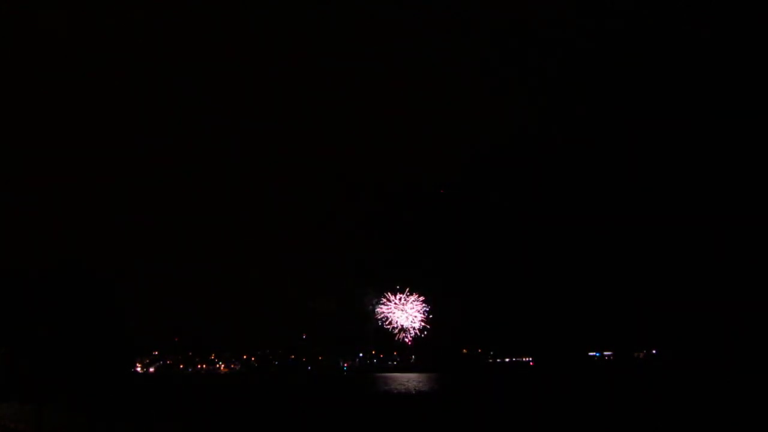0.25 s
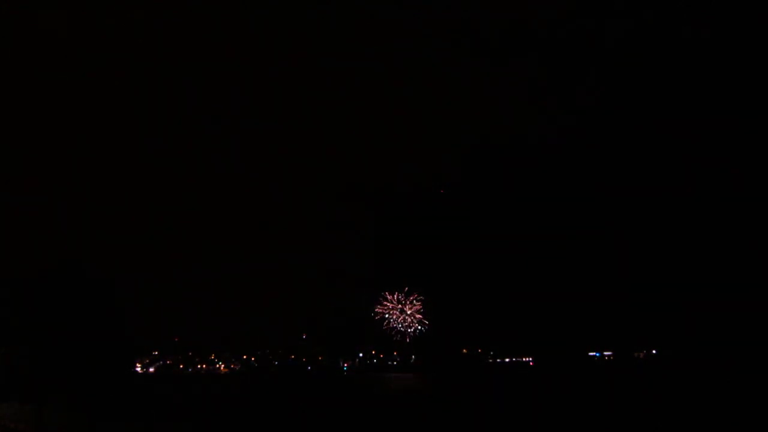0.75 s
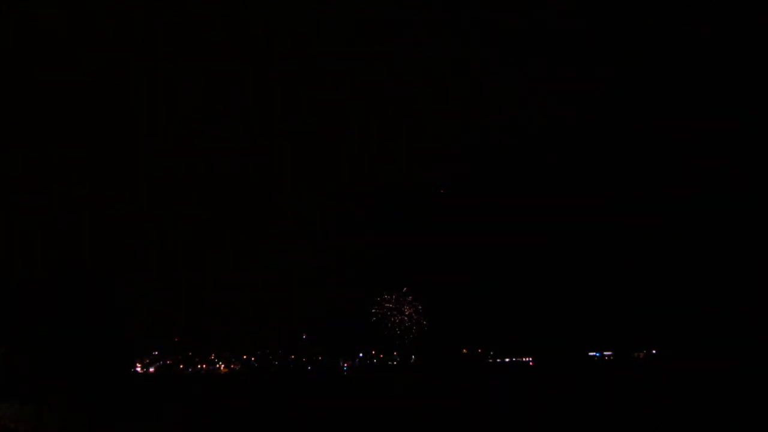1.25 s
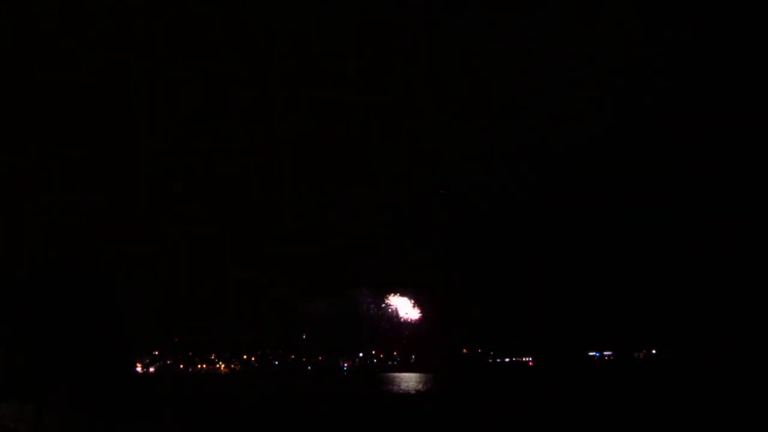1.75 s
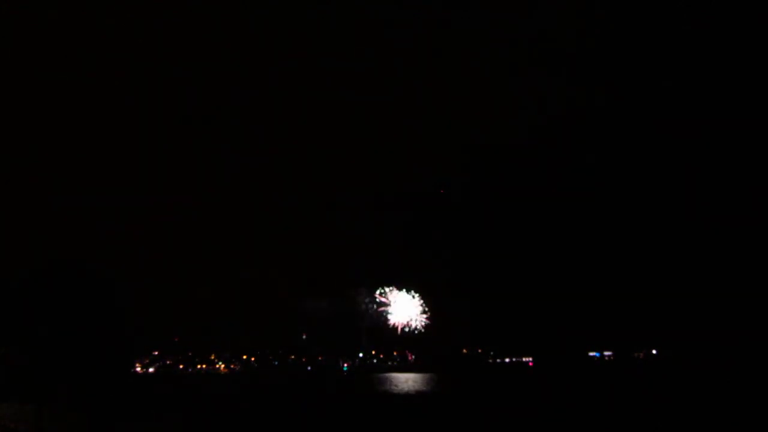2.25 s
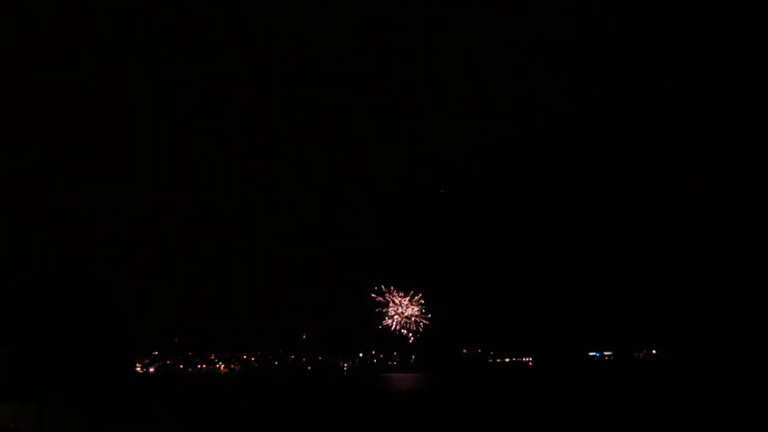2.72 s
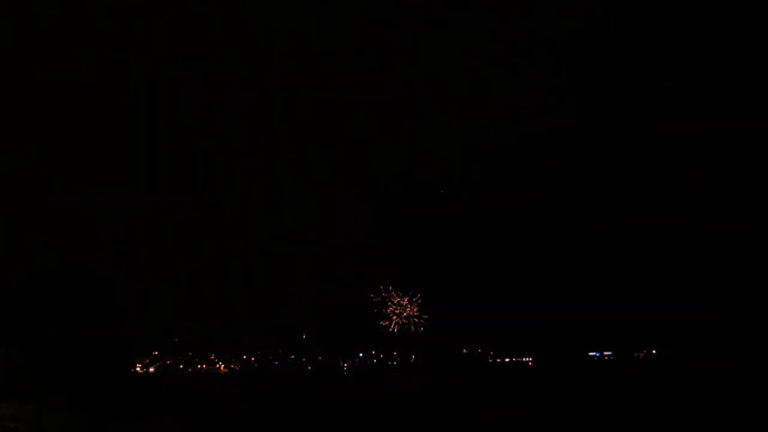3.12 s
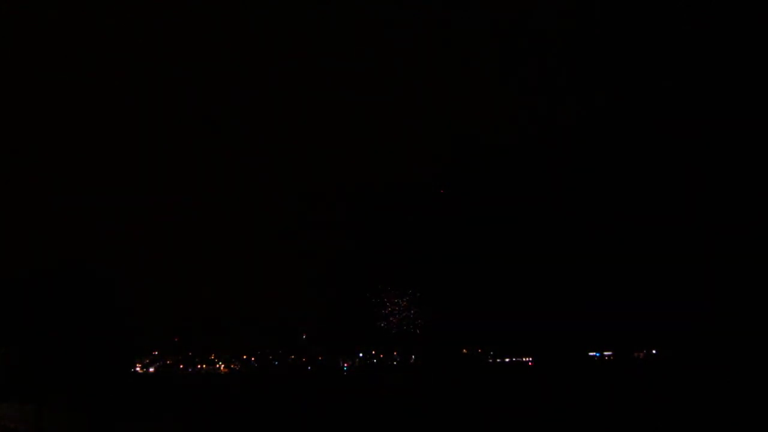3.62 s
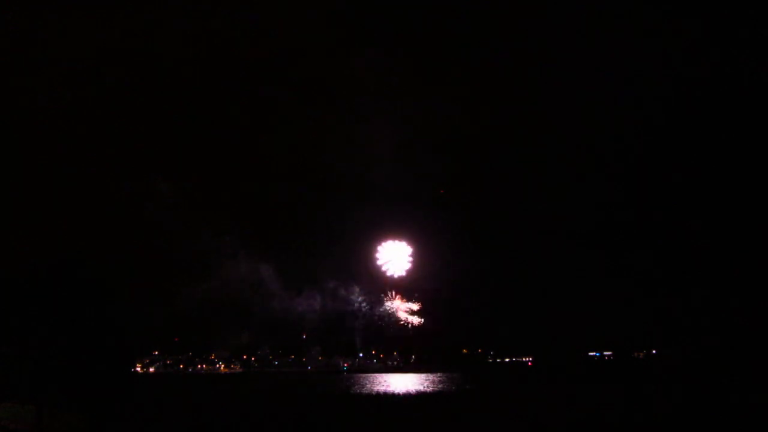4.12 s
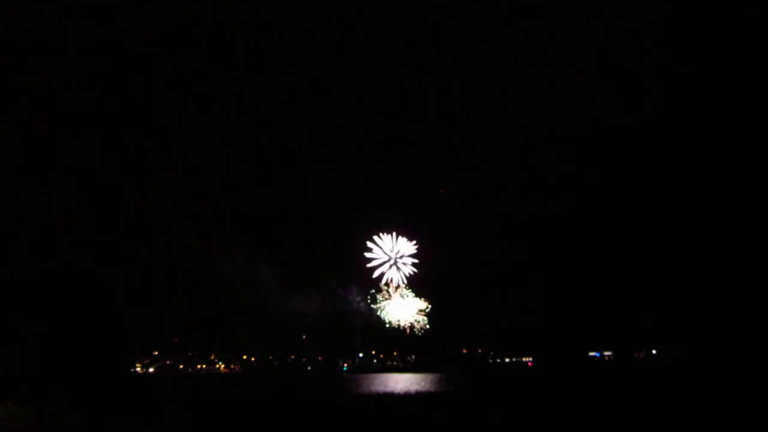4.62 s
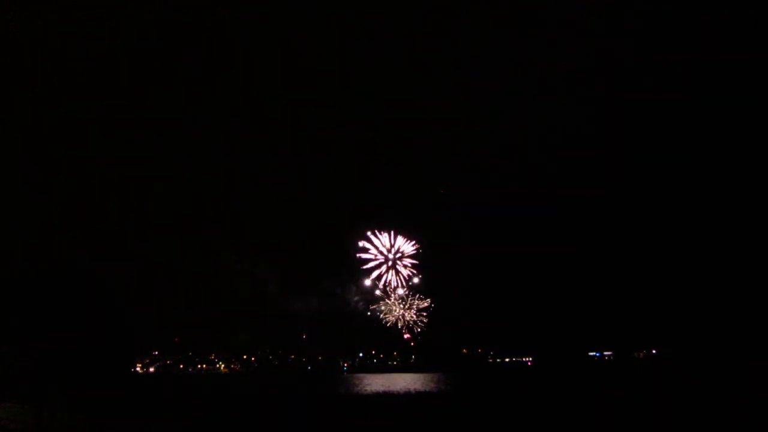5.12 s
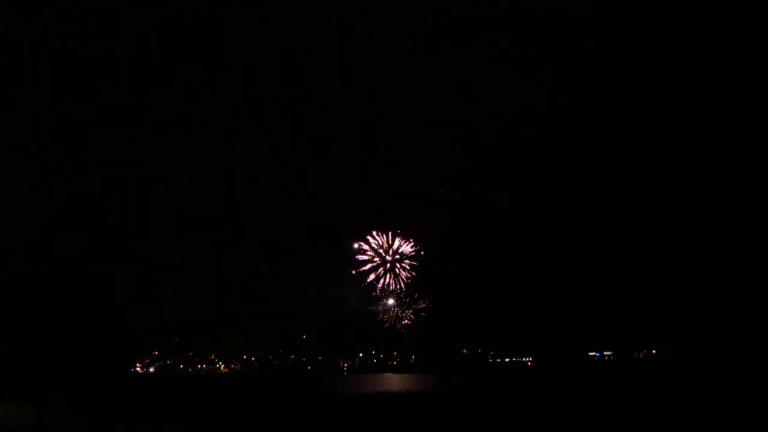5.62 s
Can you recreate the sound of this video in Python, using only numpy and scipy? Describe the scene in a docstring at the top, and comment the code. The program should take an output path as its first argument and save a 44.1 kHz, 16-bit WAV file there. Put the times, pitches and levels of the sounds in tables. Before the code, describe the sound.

Distant fireworks over open night water: three tight volleys of sharp cracking bangs, each followed by echoing thuds and a long low roll fading into hiss.

```python
"""Open water at night, with fireworks heard from the far shore.
Each shell arrives as an N-shaped shock wave; mortars thump lower and spit a burst of turbulent gas.
The shore scatters every bang, hills and buildings return the shells after fixed delays, and a long roll
swells and dies behind them. Faint crackles come in short flurries over a steady hiss.
A slow gain control drops after the bangs and creeps back up; a fast limiter holds their peaks down."""
import sys
import numpy as np
from scipy import signal
from scipy.fft import rfft, irfft, next_fast_len
from scipy.io import wavfile
from scipy.ndimage import uniform_filter1d, minimum_filter1d

SR = 44100
rng = np.random.default_rng(int(sys.argv[2]) if len(sys.argv) > 2 else 0)


def digitize_waveform(pressure):
    """Quantize a signal to 16-bit integers and store it at the path in sys.argv[1].

    Rows of a 2-D input are taken as channels; values are limited to [-1, 1].
    """
    field = np.atleast_2d(pressure).T
    bounded = np.clip(field, -1, 1)
    quanta = np.round(bounded * 32767).astype(np.int16)
    wavfile.write(sys.argv[1], SR, quanta)


N = 258426  # length in samples

# Shell bursts, as N waves with a rounded front and rear shock and an echo from the ground:
# start_s, relative_db, wave_length_s, front_sharpness_hz, rear_sharpness_hz, ground_delay_s
SHELL_BURSTS = [(1.2175, 0.3, 0.0022, 4220, 2720, 0.0024), (1.2991, 2.5, 0.0022, 4840, 3300, 0.0024),
                (1.3027, -1, 0.0022, 3410, 1700, 0.0015), (1.3287, 2.5, 0.0023, 3050, 760, 0.0021),
                (1.3496, 2, 0.0021, 4300, 1480, 0.0017), (1.3507, -2.5, 0.0022, 860, 5900, 0.0022),
                (1.6324, 2.5, 0.0023, 1770, 1500, 0.0019), (3.3809, 0, 0.0022, 5500, 4670, 0.0022),
                (3.3843, -2, 0.0026, 2520, 3830, 0.0021), (3.5016, 1, 0.0024, 2250, 1960, 0.0021),
                (3.5161, 5, 0.0023, 1270, 3680, 0.0024), (3.5366, 0.5, 0.0022, 2560, 4350, 0.0016),
                (3.5621, -1.5, 0.00227, 4370, 4400, 0.0022), (3.6822, -2.5, 0.00216, 3260, 4270, 0.0018),
                (5.7058, 0.5, 0.0014, 5000, 293, 0.0042), (5.8114, 1, 0.0023, 1870, 5060, 0.0014),
                (5.8171, -2.5, 0.0026, 3060, 3980, 0.0024), (5.8392, -1.5, 0.002, 2980, 3480, 0.0025)]
# Mortar firings, longer waves with a soft rear:
# start_s, relative_db, wave_length_s, front_sharpness_hz, rear_sharpness_hz, ground_delay_s
MORTAR_FIRINGS = [(3.1682, -2, 0.0058, 910, 120, 0.00374), (5.6673, 0.35, 0.0042, 475, 119, 0.00306)]
# Colour the microphone gives every bang, echo and thud: frequency_hz, relative_db
MICROPHONE_COLOUR = [(25, -59), (60, -7.5), (125, 4.5), (200, -0.5), (350, 0), (600, 4.5), (1000, 4.5),
                     (1700, 8.5), (2800, 10), (4200, 7), (6000, 8), (8000, 1.5), (11000, -10.5),
                     (16000, -28.5)]
# Stereo balance of the direct sound: frequency_hz, left_minus_right_db
DIRECT_BALANCE = [(60, 3.5), (200, 1), (700, -2), (2400, -2.5), (4400, -2), (8000, 2.5), (15000, -0.5)]
# Stereo balance of the echoes: frequency_hz, left_minus_right_db
ECHO_BALANCE = [(60, 2), (200, 1.5), (1300, -0.5), (4000, 0.5)]


def explosions():
    """Superposition: the direct waves of shells and mortars add to their scattered sound."""
    shells, mortars = blasts(SHELL_BURSTS), blasts(MORTAR_FIRINGS)
    near = scatter(shells, t60=0.045, db=-14, top_hz=3500)
    near += scatter(mortars, t60=0.08, db=-4.5, top_hz=1500)
    far = shore(shells + gain_of(4.5) * mortars, build_s=0.0029)
    direct = colour(shells + mortars + near, MICROPHONE_COLOUR, DIRECT_BALANCE)
    return direct + colour(far, MICROPHONE_COLOUR, ECHO_BALANCE)


def blasts(rows, echo_db=-6.0, ground_hz=500):
    """Ground reflection: each wave arrives twice, and the soft ground returns mainly its bass."""
    direct, ground = np.zeros((2, N))
    for start_s, db, length_s, front_hz, rear_hz, delay_s in rows:
        wave = n_wave(db, length_s, front_hz, rear_hz)
        add(direct, start_s, wave)
        add(ground, start_s + delay_s, wave)
    dull = signal.lfilter(*signal.butter(1, ground_hz, fs=SR), ground)
    return direct + gain_of(echo_db) * dull


def n_wave(db, length_s, front_hz, rear_hz, size=2048):
    """Nonlinear shock: pressure jumps up, falls evenly below zero and jumps back."""
    hz = np.fft.rfftfreq(size, 1 / SR)[1:]
    s = 2j * np.pi * hz  # Laplace variable: 1 / s is a step, 1 / s**2 a ramp
    late = np.exp(-s * length_s)
    ramp = (1 - late) / (length_s * s ** 2)
    front = (1 / s - ramp) * rounded(hz, front_hz)
    rear = (late / s - ramp) * rounded(hz, rear_hz)
    spectrum = (front + rear) * np.cos(np.pi * hz / SR)  # tapers to zero at half the sample rate
    wave = irfft(np.r_[0, spectrum])[:size // 2]
    return gain_of(db) * SR * (wave - wave[-1])  # rests at zero pressure


def rounded(hz, sharp_hz):
    """Air absorption rounds a shock: a gentle slope above its sharpness, a steeper one further up."""
    return 1 / (1 + 1j * hz / sharp_hz) / (1 + 1j * hz / (3.16 * sharp_hz)) ** 2


def muzzle(db=-7, t60=0.03, tail_db=-18, tail_t60=0.27):
    """Turbulent jet noise: each mortar's gas starts with its shock and dies in a fast and a slow stage."""
    # Spectrum of the rough blast from a mortar's mouth: frequency_hz, relative_db
    jet_spectrum = [(80, 0.5), (250, 4.5), (1000, 6), (1700, 1), (2600, -3), (4000, -20.5), (5800, -24.5),
                    (8000, -55.5), (16000, -82.5)]
    t = np.arange(SR // 4) / SR
    fade = gain_of(-60 * t / t60) + gain_of(tail_db - 60 * t / tail_t60)
    envelope = np.zeros(N)
    for start_s, *_ in MORTAR_FIRINGS:
        add(envelope, start_s, fade)
    return gain_of(db) * colour(envelope * rng.standard_normal(N), jet_spectrum, DIRECT_BALANCE)


def scatter(x, t60, db, top_hz):
    """Diffuse scattering: nearby ground and stones throw back a brief, dull spray of each wave."""
    t = np.arange(SR // 4) / SR
    onset = 1 - np.exp(-t / 0.0097)
    taps = diffuse(rng.standard_normal((2, len(t)))) * gain_of(-60 * t / t60) * onset
    taps = signal.lfilter(*signal.butter(1, top_hz, fs=SR), taps / np.linalg.norm(taps[0]))
    return gain_of(db) * signal.oaconvolve(x[None], taps, axes=1)[:, :N]


def shore(x, build_s):
    """Reverberation: countless reflections along the shore, each band dying at its own speed."""
    # Scatter from the shore: frequency_hz, relative_db, t60_s
    shore_bands = [(61.1, -30, 0.82), (197, -7, 1), (503, -11.5, 2.3), (1200, -17.5, 1.1),
                   (2500, -17, 2.74), (5100, -17.5, 2.15), (8000, -17, 0.87), (14000, -7, .5)]
    taps = diffuse(rng.standard_normal((2, 2 * SR)))
    hz, t, bands = signal.stft(taps, SR, nperseg=256)
    t60 = read(shore_bands, hz, axis=2)[:, None]
    fade = np.exp(-np.log(1000) * t / t60)
    fade *= np.sqrt(2 * np.log(1000) / (t60 * SR))  # evens the energy of slow and fast decays
    level = gain_of(read(shore_bands, hz))[:, None]
    bands = bands * fade * level * (1 - np.exp(-t / build_s))
    return signal.fftconvolve(x[None], signal.istft(bands, SR)[1], axes=1)[:, :N]


def echoes():
    """Discrete reflection: each reflector returns all the shells, late, dull and a little smeared."""
    # Hills or buildings that return every shell: delay_s, relative_db, cutoff_hz
    reflectors = [(0.289, -32.5, 2010), (0.495, -22.5, 705), (0.796, -19.5, 746)]
    shells, back = blasts(SHELL_BURSTS), np.zeros(N)
    for delay_s, db, top_hz in reflectors:
        dull = signal.lfilter(*signal.butter(2, top_hz, fs=SR), shells)
        add(back, delay_s, gain_of(db) * dull)
    smear = scatter(back, t60=0.07, db=-7, top_hz=2000)
    return colour(back + smear, MICROPHONE_COLOUR, ECHO_BALANCE)


def thuds(length_s=0.0026):
    """Absorption over a long path: hills and buildings return single bangs, smeared and dull."""
    # Lone distant thuds: start_s, relative_db, sharpness_hz
    lone_returns = [(1.5067, -18.5, 1490), (1.5891, -18.5, 2600), (3.7414, -21, 1296), (3.892, -14, 298.6),
                    (3.9595, -17.5, 1800), (3.9881, -14.5, 1100), (4.171, -20, 900), (5.11, -29.5, 1490),
                    (5.144, -28, 1370), (5.3739, -31.5, 920), (5.784, -22, 1190)]
    waves = np.zeros(N)
    for start_s, db, sharp_hz in lone_returns:
        add(waves, start_s, n_wave(db, length_s, sharp_hz, sharp_hz))
    waves = signal.sosfilt(signal.butter(3, 2500, fs=SR, output="sos"), waves)
    smear = scatter(waves, t60=0.06, db=-8, top_hz=2000)
    return gain_of(2) * colour(waves + smear, MICROPHONE_COLOUR, ECHO_BALANCE)


def roll():
    """Incoherent summation: far echoes merge into a rumble, with a higher clatter above it."""
    # Spectrum of the low rumble: frequency_hz, relative_db
    rumble_spectrum = [(25, -62), (45, -27.5), (75, -13.5), (130, -3), (210, 0.5), (390, -5), (620, -15.5),
                       (1200, -27), (4000, -100.5)]
    # Spectrum of the clatter: frequency_hz, relative_db
    clatter_spectrum = [(250, -22.5), (550, -5), (850, 2.5), (1100, -1.5), (1350, -3.5), (1800, -7.5),
                        (2600, -16), (4000, -32), (7000, -43), (12000, -64.5)]
    rumble = evened(colour(arrivals(per_s=3000, spread_db=1.5), rumble_spectrum, ECHO_BALANCE))
    clatter = evened(colour(arrivals(per_s=4000, spread_db=1), clatter_spectrum, ECHO_BALANCE))
    rumble *= rolling(db=-35.0, crest_s=0.46, rise_db_per_s=12.5, fall_db_per_s=15, floor_db=-40.5)
    clatter *= rolling(db=-44.0, crest_s=0.3, rise_db_per_s=15, fall_db_per_s=13.5, floor_db=-50)
    return rumble + clatter


def rolling(db, crest_s, rise_db_per_s, fall_db_per_s, floor_db, size=1200):
    """Power addition: each bang's echoes swell to a crest and die away over a steady floor."""
    # The salvo whose roll is still dying away at the start: start_s, relative_db
    earlier_salvo = (-1.6, 10.3)
    t = np.linspace(0, N / SR, size)
    power = np.full(size, gain_of(floor_db) ** 2)
    for start_s, bang_db, *_ in [earlier_salvo] + SHELL_BURSTS + MORTAR_FIRINGS:
        late = t - start_s - crest_s
        shape_db = np.minimum(rise_db_per_s * late, -fall_db_per_s * late)
        power += (t > start_s) * gain_of(db + bang_db + shape_db) ** 2
    return np.interp(np.arange(N) / SR, t, np.sqrt(power))


def crackle():
    """Band-limited impulse noise: short flurries of tiny cracks, each in its own band."""
    # Flurries, with levels ahead of the air's filter: start_s, length_s, level_db, lowest_hz, highest_hz
    flurries = [(0.174, 0.009, -44, 1100, 3300), (2.103, 0.14, -40.5, 610, 1794),
                (2.593, 0.02, -47.5, 900, 3700), (2.945, 0.033, -45, 497, 2930),
                (2.979, 0.0577, -38, 450, 2220), (3.037, 0.017, -50, 600, 3800),
                (3.971, 0.03, -33.5, 703, 2770), (4.292, 0.14, -44.5, 574, 1500),
                (5.107, 0.029, -44.5, 900, 1830), (5.191, 0.041, -43, 900, 1700),
                (5.605, 0.024, -50.5, 1700, 4430), (5.634, 0.0105, -49, 1700, 4700)]
    # What the air leaves of a distant crack: frequency_hz, relative_db
    air_loss = [(200, 0), (2800, 0), (5200, -3), (8000, -20), (16000, -60)]
    cracks, out = arrivals(per_s=2900, spread_db=4.0), np.zeros((2, N))
    for start_s, length_s, db, low_hz, high_hz in flurries:
        band = signal.butter(3, [low_hz, high_hz], "band", fs=SR, output="sos")
        part = cracks[:, int(start_s * SR):][:, :int(length_s * SR)]
        flurry = gain_of(db) * evened(signal.sosfilt(band, part))
        flurry *= signal.windows.tukey(part.shape[1], 0.4)  # soft start and end
        for port, sound in zip(out, flurry):
            add(port, start_s, sound)
    return colour(out, air_loss, ECHO_BALANCE)


def hiss():
    """Stationary noise: the faint steady hiss of the night air and the microphone."""
    # Spectrum of the hiss: frequency_hz, relative_db
    hiss_spectrum = [(100, 6.5), (2000, 2.5), (4000, -9), (7500, -15.5), (10000, -26), (12500, -34),
                     (16000, -35)]
    noise = diffuse(rng.standard_normal((2, N)))
    return gain_of(-59.5) * evened(colour(noise, hiss_spectrum, ECHO_BALANCE))


def arrivals(per_s, spread_db):
    """Poisson-like process: random small pressure pulses of uneven size at both ports."""
    size = gain_of(spread_db * np.minimum(rng.exponential(1, (2, N)), 4))
    present = rng.random((2, N)) < per_s / SR
    return diffuse(size * rng.standard_normal((2, N)) * present)


def diffuse(pair):
    """Diffuse-field coherence: sound from all sides is more alike in the bass at two close ports."""
    # Left-right likeness of the echoes: frequency_hz, coherence (0 to 1)
    coherence = [(60, .94), (130, 0.89), (290, 0.77), (640, 0.54), (1400, 0.41), (3100, 0.133),
                 (15000, 0.15)]
    size = next_fast_len(pair.shape[1], True)
    a, b = rfft(pair, size)
    same = np.clip(read(coherence, np.fft.rfftfreq(size, 1 / SR)), 0, 1)
    common = a * np.sqrt((1 + same) / 2)
    apart = b * np.sqrt((1 - same) / 2)
    return irfft(np.array([common + apart, common - apart]), size)[:, :pair.shape[1]]


def colour(x, points, pan, size=4096):
    """Minimum-phase filtering: a causal filter with the given spectrum, one for each channel."""
    hz = abs(np.fft.fftfreq(size, 1 / SR))
    log_gain = np.log(gain_of(read(points, hz)) * sides(read(pan, hz)))
    # the Hilbert transform of the log gain gives the phase
    taps = np.fft.ifft(np.exp(np.conj(signal.hilbert(log_gain)))).real[:, :size // 2]
    return signal.oaconvolve(np.atleast_2d(x), taps, axes=1)[:, :N]


def sides(pan_db):
    """Stereo level difference: left and right gains that share it equally."""
    return gain_of(np.array([pan_db, -pan_db]) / 2)


def read(points, hz, axis=1):
    """Logarithmic frequency scale: interpolates one column of a table along it."""
    table = np.transpose(points)
    return np.interp(np.log(hz + 1), np.log(table[0] + 1), table[axis])


def gain_of(db):
    """Decibel scale: turns a level into an amplitude factor."""
    return 10 ** (np.asarray(db) / 20)


def evened(x):
    """Root mean square: scales a sound to an effective value of 1."""
    return x / np.sqrt(np.mean(x ** 2) + 1e-20)


def add(mix, start_s, sound):
    """Linear superposition: adds a sound in place from its start time."""
    part = mix[max(round(start_s * SR), 0):][:len(sound)]
    part += sound[:len(part)]


def scene():
    """Superposition of every sound that reaches the microphone."""
    return explosions() + muzzle() + echoes() + thuds() + roll() + crackle() + hiss()


def gain_control(x, threshold_db=-17, share=0.24, attack_s=0.042, recover_db_per_s=2.5, start_db=2.5):
    """Level compression: loud peaks turn the gain down and it creeps back up, as it does at the start."""
    climb = recover_db_per_s * np.arange(N) / SR
    over_db = share * (20 * np.log10(abs(x).max(0) + 1e-9) - threshold_db)
    # holding the peak of a climbing level and taking the climb off again gives a steady recovery
    held_db = np.maximum.accumulate(np.maximum(over_db + climb, start_db))
    cut_db = np.maximum(held_db - climb, 0)
    pole = np.exp(-1 / (attack_s * SR))
    smooth_db = start_db + signal.lfilter([1 - pole], [1, -pole], cut_db - start_db)
    return x / gain_of(smooth_db)


def record(dry, lag_hz=520, ceiling=0.9):
    """Dispersion and limiting: slow gain control, bass delayed behind treble, fast limiter, band limit."""
    pole = np.exp(-2 * np.pi * lag_hz / SR)
    lagged = signal.lfilter([-pole, 1], [1, -pole], gain_control(dry))  # all-pass
    allowed = np.minimum(1, ceiling / (abs(lagged) + 1e-9))
    gain = minimum_filter1d(allowed, size=15)
    gain = uniform_filter1d(uniform_filter1d(gain, size=11), size=11)
    edge = signal.firwin(511, 16250, window=("kaiser", 9), fs=SR)  # low-pass, cutoff in Hz
    return signal.oaconvolve(lagged * gain, edge[None], "same")


dry = scene()
out = record(dry)
digitize_waveform(out)
```